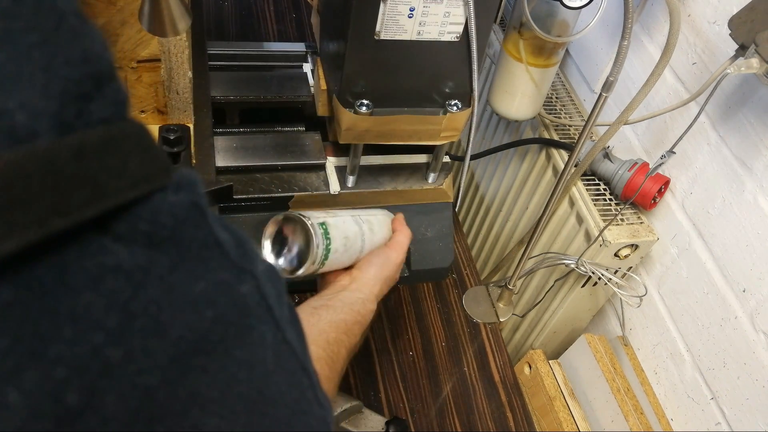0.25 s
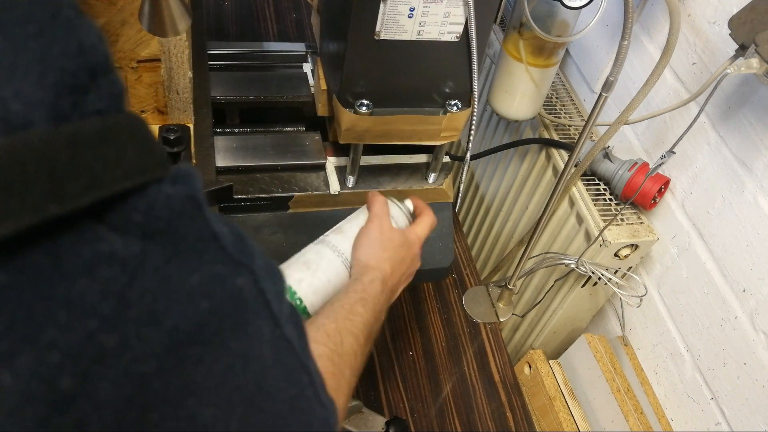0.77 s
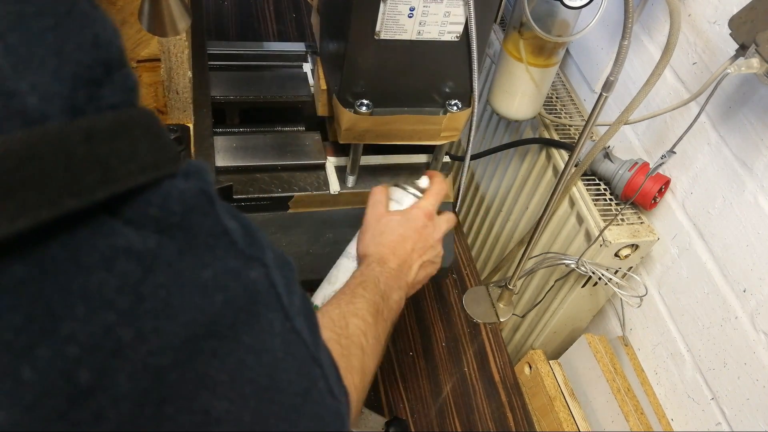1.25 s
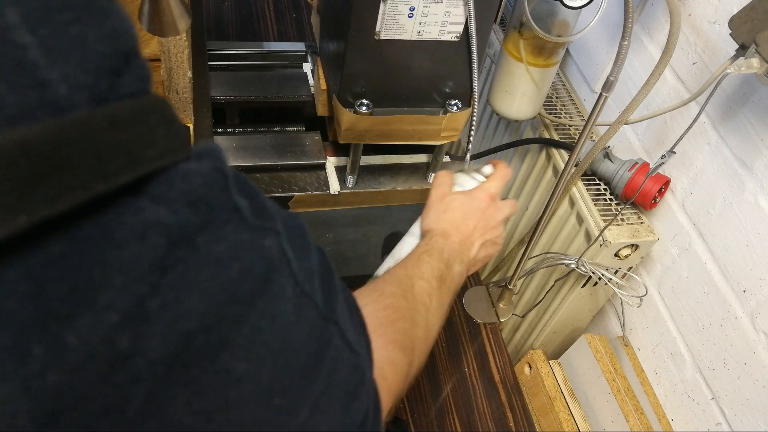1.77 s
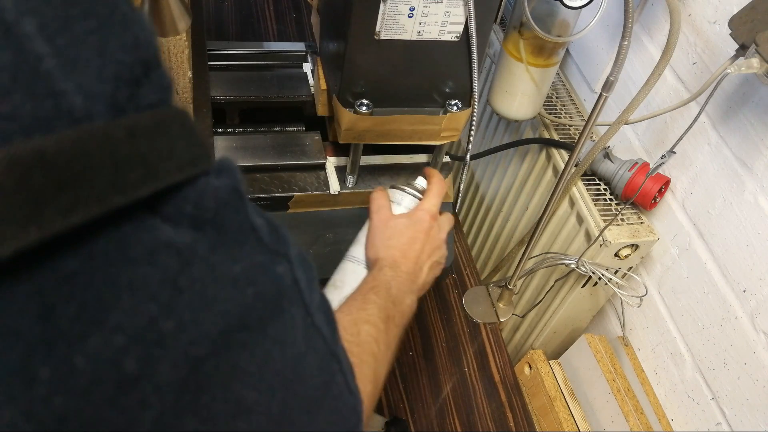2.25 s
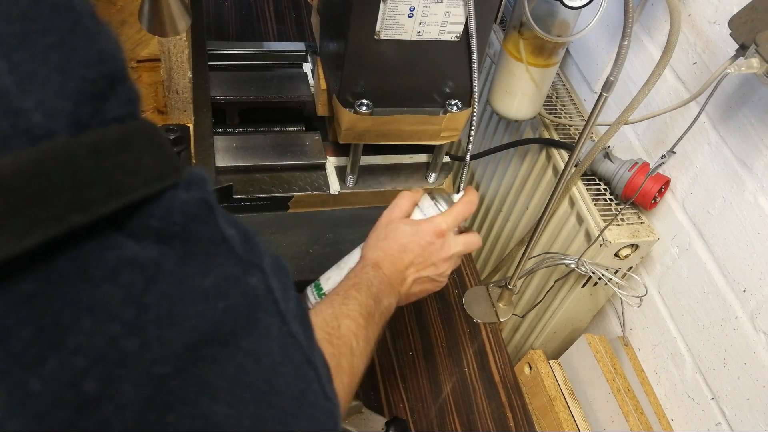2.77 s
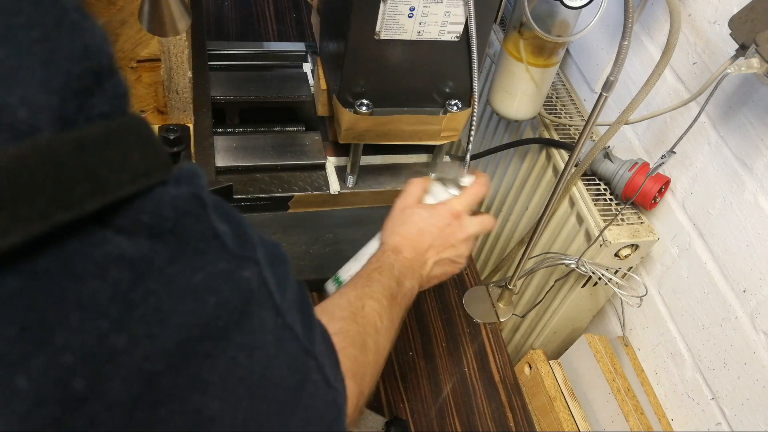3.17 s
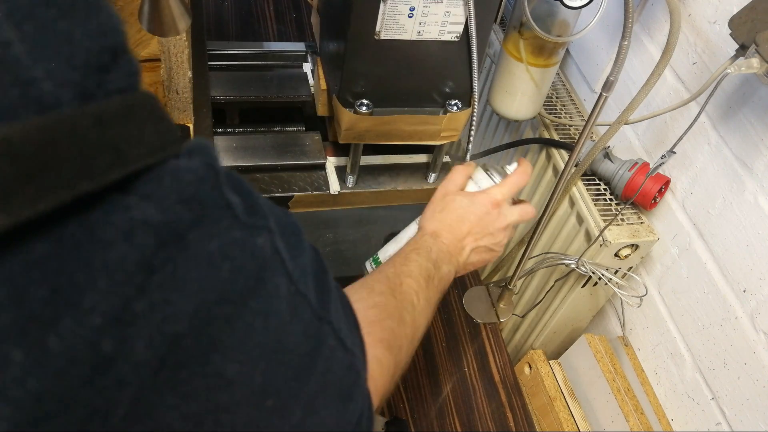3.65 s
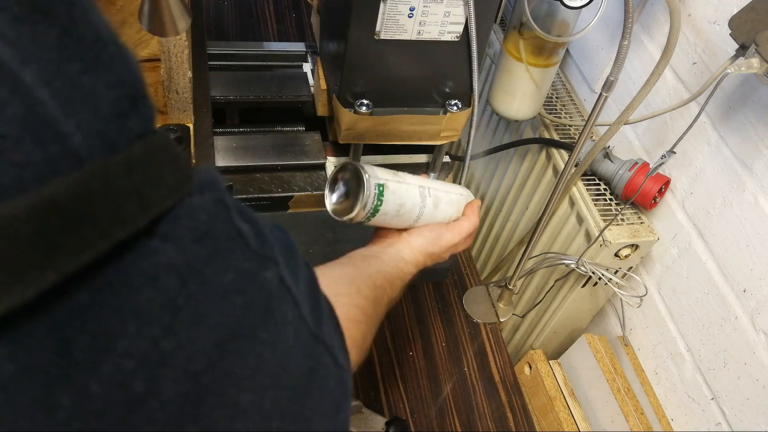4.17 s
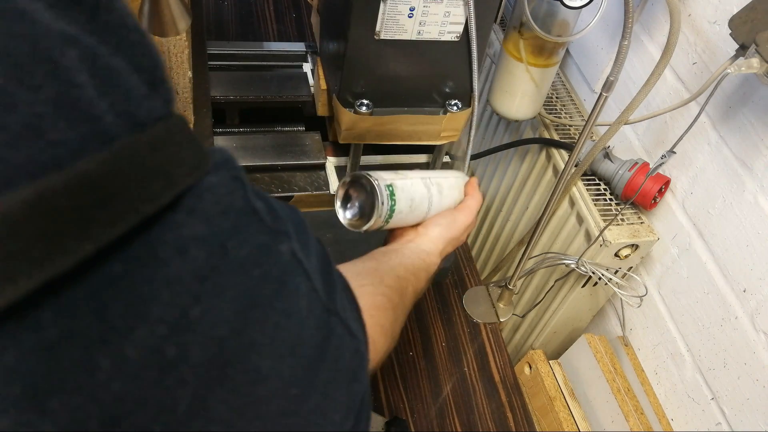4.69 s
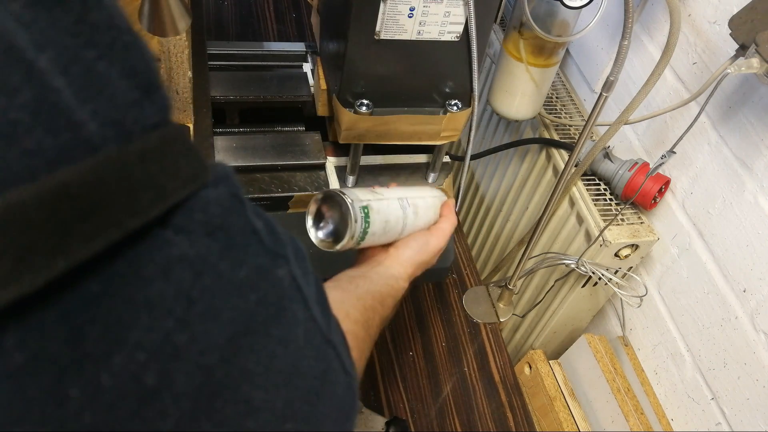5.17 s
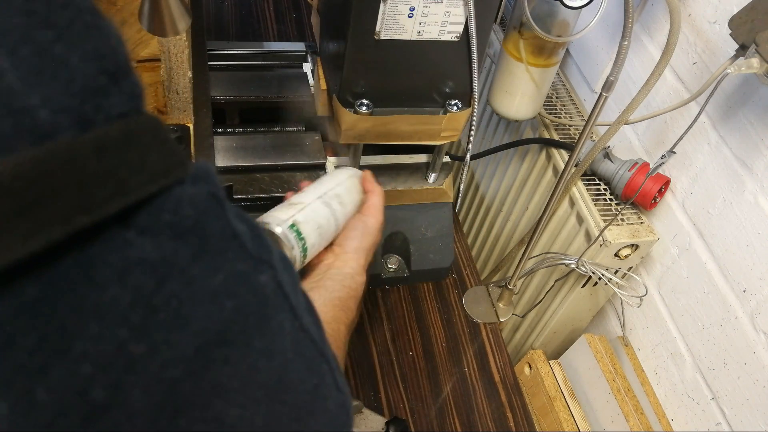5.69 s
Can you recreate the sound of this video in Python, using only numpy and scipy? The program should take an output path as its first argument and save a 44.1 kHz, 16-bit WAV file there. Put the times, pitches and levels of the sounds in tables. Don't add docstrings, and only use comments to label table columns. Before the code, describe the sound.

Close stereo pickup of a spray can: quick irregular clacks and dull knocks first, with a puff or two of gas; then quieter tinkling, rolling and waveringly ringing metal between crisp, short sprays; finally a vigorous, brighter rattle with the loudest cracks, more hisses and a faint low rumble of the moving arm. Small dry room, little bass, very quiet background.

```python
import sys
import numpy as np
from scipy import signal
from scipy.fft import rfft, irfft, next_fast_len
from scipy.io import wavfile

SR = 44100
rng = np.random.default_rng(int(sys.argv[2]) if len(sys.argv) > 2 else 0)


def materialize(psi):
    bounded = np.clip(np.atleast_2d(psi).T, -1, 1)
    quanta = np.round(bounded * 32767).astype(np.int16)
    wavfile.write(sys.argv[1], SR, quanta)


def makeup_ratio(level_db):
    decades = np.asarray(level_db, float) / 20
    return 10 ** decades


N = 261513

# f/Hz, level/dB, t60/s
WALL_MODES = [(790, -13, .1), (1170, -7, .1), (1430, -9, .05), (1540, -5, .1), (1720, -2, .09),
              (1800, -5, .09), (1865, -2, .11), (1960, 0, .09), (2200, -6, .07), (2330, -6, .07),
              (2460, -5, .12), (2800, -3, .05), (3400, -3, .04), (3600, -4, .04), (3850, -2, .04),
              (4080, -2, .04), (4440, -6, .06), (4540, -10, .07), (4620, -9, .1), (4720, -11, .06)]
# f/Hz, level/dB per Hz
WASH_SPECTRUM = [(290, -5.5), (500, -13), (794, -5.5), (1080, -6), (1160, -5.5), (1390, -0.5), (1650, -1.5),
                 (2040, -2.5), (2340, 1.5), (4580, 1), (5000, 0.5), (6500, 3), (11000, -120)]

LEFT_RIGHT = np.array([[.5], [-.5]])
KNOCK_LEFT_DB = 2
DOME_LOW_HZ, DOME_HIGH_HZ = 4400, 4800
UPRIGHT_FROM_S, UPRIGHT_TO_S = 1.1, 4.25
SLOSH_HZ, SLOSH_DEPTH, DAMPING = 45, 0.8, 0.75
SONG_WAVER = .5


def ball():
    # f/Hz, level/dB per Hz
    crack_spectrum = [(1180, -60), (2000, -22), (2360, -7.5), (2980, -10.5), (4120, -5), (4990, -11),
                      (8850, -12), (12000, -23), (14300, -18), (16000, -33)]
    # f/Hz, level/dB per Hz
    thud_spectrum = [(290, -58), (500, -7), (781, -11), (951, -7), (1450, 3), (1710, 3), (2400, -2.5),
                     (3120, -2), (5280, -120)]
    s, peak_db, thud_db, crack_db, struck_hz, ring_db = knocks().T
    upright = (s > UPRIGHT_FROM_S) & (s < UPRIGHT_TO_S)
    regrip = (s > 1.1) & (s < 1.25)
    grip_db = np.where(upright, 0, -6) + 1 * regrip
    touch, dome_touch = rolling() * rolls()

    body = coloured(crack_spectrum)
    middle = signal.sosfiltfilt(signal.butter(4, 7200, fs=SR, output="sos"), body)
    out = clack(rms_one(middle), crack_db, struck_hz) + pings()
    top_snap = burst(strikes(crack_db - 7.5), 0.00016, 0.024)
    top_tail = burst(strikes(crack_db - 29.5), 0.0014, 0.24)
    out += rms_one(body - middle) * (top_snap + top_tail)
    out += coloured(thud_spectrum) * burst(strikes(thud_db - 7.5), 0.0005, 0.081)
    out += makeup_ratio(-24) * body * burst(np.abs(touch), 0.00038, 0.026)

    for hz, level_db, t60 in WALL_MODES:
        low = np.clip((2300 - hz) / 300, 0, 1)
        uneven_db = rng.normal(0, 2.6, (len(s), 2)).T
        held_db = grip_db * (t60 >= .1)
        clicks = strikes(-17.0 + low * (thud_db + 3.5) + uneven_db + held_db)
        on_dome = DOME_LOW_HZ < hz < DOME_HIGH_HZ
        clicks += makeup_ratio(-19) * dome_touch if on_dome else makeup_ratio(-33 + 7 * low) * touch
        push = rng.choice(np.array([-1, 1], np.int8), (2, N))
        out += slosh() * ring(makeup_ratio(level_db) * clicks * push, hz, DAMPING * t60)
    return signal.sosfilt(signal.butter(3, 700, "high", fs=SR, output="sos"), out)


def knocks():
    # t/s, peak level/dB, spot pitch f/Hz, thud level/dB re peak
    side_knocks = [(0.0187, -30.5, 2155, -4), (0.171, -25, 1706, -8), (0.2816, -19, 2290, -20.5),
                   (0.5245, -40, 1840, -3), (0.543, -31, 2330, -14), (0.6002, -25.5, 2500, -12.5),
                   (0.6512, -24.5, 1770, -9), (0.6899, -29.5, 2500, -12), (1.133, -23.5, 2140, -8.5),
                   (1.162, -28, 2380, -5), (1.1853, -45.5, 1590, 12), (1.9741, -37, 1970, -9),
                   (1.9892, -34, 2120, -16), (2.018, -51, 1740, -1), (3.4046, -35, 1870, -7.5),
                   (3.77, -57.5, 1950, 8), (3.8681, -41, 1820, -3), (4.1444, -70, 1580, 14),
                   (4.5022, -20.5, 1455, -5), (4.5812, -22.5, 1416, -7.5), (4.638, -27, 1680, -6.5),
                   (5.026, -27, 2280, -35), (5.0468, -30, 2400, -8), (5.0502, -23.5, 3000, -22),
                   (5.1009, -26, 1980, -7), (5.147, -27.5, 1810, -5.5), (5.1802, -29.5, 1600, -6),
                   (5.204, -32, 1644, -7), (5.487, -21, 2620, -15.5), (5.5454, -26.5, 2420, -7.5),
                   (5.6284, -23, 1454, -8), (5.66, -26, 1690, -14), (5.6812, -31, 2250, -19),
                   (5.87, -26, 2300, -38)]
    # t/s, peak level/dB, pitch f/Hz, crack level/dB re peak
    slams = [(0.1021, -19, 4920, -10), (0.1265, -19.5, 4980, -7), (0.1415, -24.5, 4300, -16),
             (0.2979, -19.5, 3900, -4), (0.3255, -16.5, 6000, -6.5), (0.507, -27, 4050, -23),
             (0.6947, -22, 4040, -7), (0.75, -27.5, 3200, -1.5), (3.827, -23, 3570, -7.5),
             (4.4101, -8, 4100, -1.5), (4.848, -36, 3900, -12), (4.828, -25.5, 3400, -16),
             (5.2376, -12.5, 4530, 0), (5.4016, -16, 3680, -24)]
    # t/s, peak level/dB, pitch f/Hz, crack level/dB re peak
    glances = [(0.0548, -24.5, 3650, -7), (0.346, -20.5, 3900, -11), (0.374, -20.5, 5130, -6),
               (0.4441, -26, 3780, -5), (0.484, -23.5, 4410, -3), (0.713, -27, 3760, -4.5),
               (0.726, -28.5, 3920, -19), (0.462, -30.5, 3450, -15), (0.821, -37, 3100, -17),
               (0.7826, -20, 3790, -6), (0.93, -41, 3260, -11), (4.6695, -11, 6000, -3.5),
               (4.7566, -12.5, 3680, -11), (4.8098, -18.5, 4250, -4), (4.8816, -18.5, 4200, -5),
               (4.9155, -21, 4060, -15), (4.942, -24.5, 4280, -8), (4.9766, -23, 3740, -13.5),
               (5.0064, -22, 4160, -14), (5.222, -41, 4000, 1), (5.378, -19.5, 3970, -4),
               (5.693, -11.5, 4340, -3), (5.79, -26.5, 4340, -10), (5.777, -34, 3000, -10),
               (5.881, -25, 4180, -19), (5.899, -31, 3850, -15), (5.8359, -20.5, 5020, -15),
               (5.856, -26, 4650, -20)]
    # t/s, peak level/dB, thud level/dB re peak, crack level/dB re peak
    dome_drops = [(1.302, -16, -15, -1.5), (1.322, -55, -14, 18), (1.3831, -19.5, -16.5, -5),
                  (1.4544, -23.5, -12.5, -5), (1.4775, -56, -28, 0), (1.4995, -29, -28, -2),
                  (1.5115, -36, -22, -6), (1.633, -28.5, -16, -1.5), (1.659, -48, -14, 13),
                  (1.6896, -36.5, -7, 2.5), (2.0349, -32, -19, -14), (2.037, -31.5, -23, -9.5),
                  (2.051, -35, -21, -13), (2.071, -41, -2.5, -3), (2.134, -43.5, -20, -16),
                  (2.255, -53.5, -8, -1), (2.448, -43, -29, -19), (2.466, -48, -20, -6),
                  (2.856, -35, -12, -6), (2.914, -46, -9.5, -4), (3.0114, -53, -21, -12),
                  (3.3758, -29.5, -13.5, -3), (3.726, -43, -19, -8), (3.8909, -37.5, 1.5, 0),
                  (4.131, -52, -1, -22)]
    side_crack_db, side_ring_db, cupped_db = -5, -11.5, -5
    slam_thud_db, slam_ring_db = -24, -12
    glance_thud_db, glance_ring_db = -28.5, -13
    dome_ping_hz, dome_ring_db = 4620, -5
    rows = []
    for s, db, hz, thud in side_knocks:
        rows.append((s, db, thud, side_crack_db, hz, side_ring_db + cupped_db * (s > UPRIGHT_TO_S)))
    for s, db, hz, crack in slams:
        rows.append((s, db, slam_thud_db, crack, hz, slam_ring_db))
    for s, db, hz, crack in glances:
        rows.append((s, db, glance_thud_db, crack, hz, glance_ring_db))
    for s, db, thud, crack in dome_drops:
        rows.append((s, db, thud, crack, dome_ping_hz, dome_ring_db))
    return np.array(rows)


def strikes(db):
    rows, out = knocks(), np.zeros((2, N))
    out[:, (rows[:, 0] * SR).astype(int)] = makeup_ratio(rows[:, 1] + db + KNOCK_LEFT_DB * LEFT_RIGHT)
    return out


def clack(body, crack_db, struck_hz):
    spot_bands = [2000, 2600, 3200, 3800, 4500, 5500, 7200]
    snap_s, spread_s = .025, .0006
    out = 0
    for k, (low, high) in enumerate(zip(spot_bands, spot_bands[1:])):
        near = np.log(np.sqrt(low * high) / struck_hz) / .25
        bright_db = np.clip((low - 4000) / 3000, 0, 1) * (crack_db + 8)
        band_filter = signal.butter(2, [low, high], "band", fs=SR, output="sos")
        band = (-1) ** k * makeup_ratio(-8.5 if high < 6000 else -3) * signal.sosfilt(band_filter, body)
        snap_db = -6.5 + 7.7 * np.exp(-near ** 2) + 0.43 * bright_db
        snap = lag(burst(strikes(snap_db), spread_s, snap_s), spread_s / 2)
        tail = burst(strikes(-18 + bright_db), 0.0014, 0.19)
        out = out + band * (snap + tail)
    return out


def pings():
    out, t = np.zeros((2, N + SR)), np.arange(SR // 5) / SR
    chance = rng.random((len(knocks()), 5))
    for (s, peak_db, thud_db, crack_db, hz, ring_db), (a, b, c, d, e) in zip(knocks(), chance):
        on_dome = DOME_LOW_HZ < hz < DOME_HIGH_HZ
        t60 = .055 if on_dome else .05 * (2000 / hz) ** .7
        main = np.sin(2 * np.pi * (hz * t + a + behind(hz, b)))
        twin = .6 * np.sin(2 * np.pi * (hz * (.965 + .07 * e) * t + [[c], [d]]))
        swell = makeup_ratio(-60 * t / t60) * np.minimum(t / .002, 1)
        start = int(s * SR)
        out[:, start:start + len(t)] += makeup_ratio(peak_db + ring_db) * swell * (main + twin)
    return (1 + SONG_WAVER * drift(SLOSH_HZ)) * out[:, :N] * makeup_ratio(KNOCK_LEFT_DB * LEFT_RIGHT)


def rolling():
    sizes = makeup_ratio(3.8 * np.minimum(rng.exponential(1, N), 4))
    contacts_per_s = 900 * makeup_ratio(3 * drift(25))
    return rms_one(sizes * (rng.random(N) < contacts_per_s / SR))


def rolls():
    # loudest t/s, swell t/s, fade t/s, wall level/dB, domed base level/dB
    roll_events = [(0.511, 0.022, 0.15, -52.5, -43.5), (0.72, 0.079, 1, -56, -71),
                   (1.15, 0.018, 0.31, -55, -50), (1.5, 0.23, 0.21, -49.5, -47),
                   (1.652, 0.0076, 0.21, -50.5, -41.5), (2.04, 0.16, 0.039, -51, -57),
                   (2.454, 0.048, 0.044, -61, -53), (2.859, 0.16, 0.1, -60, -53),
                   (3.015, 0.015, 0.19, -72, -72), (3.41, 0.65, 0.032, -61.5, -85),
                   (3.735, 0.054, 0.1, -59.5, -74), (3.847, 0.04, 0.24, -46, -50),
                   (4.18, 0.21, 0.16, -66, -84), (5.89, 0.092, 0.2, -57.5, -50)]
    span_db, curve = 55.5, 1.5
    out = np.zeros((2, N))
    for top, swell, fade, wall_db, dome_db in roll_events:
        t = np.arange(N) / SR - top
        loss_db = span_db * np.maximum(-t / swell, t / fade) ** curve
        out += makeup_ratio(np.array([[wall_db], [dome_db]]) - np.minimum(loss_db, 200))
    return out


def slosh():
    return (1 + SLOSH_DEPTH * drift(SLOSH_HZ)) / np.hypot(1, SLOSH_DEPTH)


def songs():
    # t/s, held t/s, f/Hz, level/dB
    palm_songs = [(0.102, 0.01, 2206, -47.5), (0.17, 0.049, 1710, -47), (0.171, 0.014, 2250, -44),
                  (0.282, 0.026, 1760, -44), (0.283, 0.03, 1500, -48), (0.405, 0.018, 1340, -60),
                  (0.4, 0.051, 2450, -54), (0.652, 0.039, 1767, -48.5), (0.281, 0.028, 2295, -38),
                  (0.715, .025, 3780, -51), (0.75, 0.01, 3160, -49), (0.752, 0.0083, 1200, -55.5),
                  (0.81, 0.052, 3110, -55), (0.82, 0.06, 2450, -55), (0.93, 0.076, 3220, -50),
                  (4.503, 0.072, 1870, -47.5), (4.507, 0.03, 1300, -47), (4.503, 0.015, 2280, -54),
                  (4.583, .014, 1450, -45), (4.583, 0.023, 2370, -58), (4.641, 0.043, 1735, -50),
                  (4.411, 0.016, 2440, -47), (4.415, 0.011, 1464, -48), (4.765, 0.021, 2250, -42.5),
                  (4.85, .1, 2300, -54), (4.83, 0.01, 3500, -38), (4.811, 0.0072, 3910, -33),
                  (5.402, .01, 3800, -38), (4.67, 0.01, 1660, -43), (4.685, .025, 2500, -50),
                  (5.046, 0.0037, 2460, -33), (5.101, 0.014, 2010, -46), (5.103, 0.016, 2560, -50),
                  (5.148, .04, 1700, -57), (5.15, 0.039, 1175, -55), (5.181, 0.041, 1624, -48),
                  (5.489, .012, 3430, -42), (5.488, .01, 2546, -39.5), (5.547, 0.012, 1270, -53),
                  (5.63, 0.099, 1536, -46.5), (5.63, 0.03, 1610, -50), (5.694, 0.056, 2310, -52),
                  (5.855, 0.1, 2370, -45)]
    # t/s, held t/s, f/Hz, level/dB
    free_songs = [(1.132, 0.009, 824, -50.5), (1.162, 0.053, 796, -53), (1.136, 0.067, 1554, -44),
                  (1.135, 0.016, 1846, -44), (1.162, 0.034, 1265, -51), (1.185, 0.035, 2425, -45.5),
                  (1.165, 0.053, 3000, -69), (1.183, 0.032, 1914, -50), (1.225, 0.1, 1876, -50.5),
                  (1.222, 0.086, 2440, -51.5), (1.133, 0.0084, 2197, -39), (1.162, .012, 2350, -44),
                  (1.399, .1, 4560, -55), (1.32, 0.045, 4480, -40), (1.47, 0.018, 4650, -43),
                  (1.8, 0.098, 937, -56), (2.719, 0.046, 1163, -53.5), (1.64, .06, 4580, -57),
                  (2.059, 0.038, 4620, -62), (2.45, 0.035, 4640, -54), (2.74, 0.087, 4650, -68),
                  (2.86, .09, 4640, -62), (2.95, .06, 4600, -74), (1.303, 0.012, 2300, -44),
                  (1.385, 0.016, 3300, -47), (1.43, .07, 2570, -46), (1.53, 0.038, 1870, -46),
                  (1.633, 0.014, 2135, -50), (1.66, .06, 2060, -49.5), (1.699, 0.035, 4670, -50),
                  (1.95, 0.088, 1950, -57), (2.025, 0.04, 1840, -51), (2.0, 0.087, 2520, -48),
                  (2.22, 0.037, 2460, -74), (2.439, 0.04, 1826, -63), (2.446, 0.025, 2460, -57),
                  (2.85, 0.047, 1840, -60), (2.91, 0.015, 2000, -60), (3.101, .06, 1150, -52.5),
                  (3.271, 0.1, 1913, -57.5), (3.28, 0.095, 2520, -64), (3.372, 0.025, 2550, -52),
                  (3.39, 0.029, 1860, -46.5), (3.7, .1, 1910, -61), (3.72, .07, 2440, -63),
                  (3.827, 0.12, 1906, -44.5), (3.899, 0.043, 1730, -56), (4.09, 0.13, 1205, -67.5),
                  (4.12, 0.083, 1594, -69), (4.225, .025, 2520, -44)]
    sag_db_per_s, fall_db_per_s = 110, 1100
    start_db, start_s = 7, .008
    wander_cycles = .16
    out, rows = np.zeros((2, N)), palm_songs + free_songs
    wavers = [1 + SONG_WAVER * drift(SLOSH_HZ) for k in range(4)]
    wanders = [wander_cycles * drift(SLOSH_HZ) for k in range(3)]
    chance = rng.random((len(rows), 2))
    for k, ((s, held, hz, db), (phase, apart)) in enumerate(zip(rows, chance)):
        i = int(s * SR)
        t = np.arange(min(SR // 4, N - i)) / SR
        span = slice(i, i + len(t))
        loss_db = sag_db_per_s * t - start_db * np.exp(-t / start_s)
        loss_db = loss_db + fall_db_per_s * np.maximum(t - held, 0)
        gain = makeup_ratio(db - loss_db) * np.minimum(t / .002, 1) * wavers[k % 4][span]
        cycles = hz * t + phase + wanders[k % 3][span] + behind(hz, apart)
        out[:, span] += gain * np.sin(2 * np.pi * cycles)
    return out * makeup_ratio(KNOCK_LEFT_DB * LEFT_RIGHT)


def behind(hz, chance):
    left_leads_s = .00009
    widest_lead_cycles = .2
    lead = min(hz * left_leads_s, widest_lead_cycles)
    return np.array([[0], [.15 * (chance - .5) - lead]])


def puffs():
    # f/Hz, level/dB per Hz
    hiss_spectrum = [(2650, -46), (4500, -10), (5110, -9), (6700, -8.5), (8740, -6.5), (10400, -6),
                     (12900, -5.5), (14900, -6), (16000, -14)]
    # f/Hz, level/dB per Hz
    gas_spectrum = [(53, -43), (100, -6.5), (150, -14), (216, 3.5), (368, 3), (436, -13), (520, -58),
                    (680, -39), (1140, -120)]
    flicker_db = 1.2
    jet_bands_db = 2.2
    hiss = valve(column=2, short_db=8.5, swell_s=0.035, sag_db_per_s=6.5, fall_db_per_s=346)
    wash = valve(column=3, short_db=25.5, swell_s=0.018, sag_db_per_s=16, fall_db_per_s=233)
    gas = makeup_ratio(-14.5) * lag(wash, 0.018)
    jet_noise = coloured(hiss_spectrum, flicker_db, jet_bands_db)
    wash_noise = coloured(WASH_SPECTRUM, 2 * flicker_db, jet_bands_db)
    out = makeup_ratio(4.5) * staggered(hiss, jet_noise, 8800, .014)
    out += makeup_ratio(5.0) * staggered(wash, wash_noise, 2000, 0.01)
    out += makeup_ratio(-23.0) * lag(wash, 0.1) * coloured([(180, -33), (205, 4.0), (235, -35)])
    out += gas * coloured(gas_spectrum, 2 * flicker_db)
    return out + makeup_ratio(-5) * wash * stirred_wall()


def valve(column, short_db, swell_s, sag_db_per_s, fall_db_per_s):
    # valve opens t/s, held t/s, nozzle hiss level/dB, wall wash level/dB
    puff_events = [(-0.12, 0.13, -37, -41), (0.335, 0.16, -38.5, -46), (0.49, 0.097, -72, -48.5),
                   (0.906, 0.14, -38, -45.5), (1.352, 0.13, -38, -46), (1.772, 0.12, -38, -44.5),
                   (2.636, 0.14, -38, -47.5), (3.08, 0.13, -36.5, -45), (3.514, 0.13, -38, -45),
                   (4.195, 0.16, -37, -46), (4.719, 0.19, -38, -47), (5.249, 0.16, -38.5, -46),
                   (5.712, 0.11, -39, -45.5)]
    open_s, knee_s = 0.0054, 0.013
    out = np.zeros(N)
    for row in puff_events:
        t = np.arange(N) / SR - row[0]
        let_go = knee_s * np.logaddexp(0, (t - row[1]) / knee_s)
        since = np.maximum(t, 0)
        db = row[column] - short_db * np.exp(-since / swell_s)
        db = db - sag_db_per_s * since - fall_db_per_s * let_go
        out += np.clip(t / open_s, 0, 1) ** 2 * makeup_ratio(db)
    return out


def staggered(gain, noise, hz, late_s):
    low = signal.sosfiltfilt(signal.butter(2, hz, fs=SR, output="sos"), noise)
    late = np.interp(np.arange(N) - late_s * SR, np.arange(N), gain)
    return gain * (noise - low) + late * low


def stirred_wall():
    noise = [coloured(WASH_SPECTRUM), coloured(WASH_SPECTRUM)]
    out = 0
    for k, (hz, db, t60) in enumerate(WALL_MODES):
        mode = rms_one(ring(noise[k % 2], hz, t60 / 2))
        out = out + makeup_ratio(db / 2 + 3 * drift(3)) * mode
    return rms_one(out)


def arm():
    # t/s, level/dB
    rumble_spells = [
        [(4.72, -89), (4.928, -73), (5.02, -77)],
        [(5.25, -95), (5.356, -62), (5.56, -82)],
    ]
    gain, t = np.zeros(N), np.arange(N) / SR
    for times, levels_db in map(np.transpose, rumble_spells):
        edge = np.clip(np.minimum(t - times[0], times[-1] - t) / .012 + 1, 0, 1)
        gain += edge * makeup_ratio(np.interp(t, times, levels_db))
    return gain * coloured([(45, -20), (70, -10), (110, 5), (150, -20)])


def workshop(x):
    room_t60_s, wall_cut_hz = 0.24, 6000
    size = next_fast_len(N + SR)
    w = 2 * np.pi * np.fft.rfftfreq(size)
    dull = 1 / (1 + (w * SR / (2 * np.pi * wall_cut_hz)) ** 2) ** .25
    source, out = rfft(x.mean(axis=0), size), []
    for lags in rng.uniform(.007, .028, (2, 10)):
        echoes = 0
        for k, d in enumerate(lags):
            loop = makeup_ratio(-60 * d / room_t60_s) * dull * np.exp(-1j * w * round(d * SR))
            echoes = echoes + (-1) ** k * loop / (1 - loop)
        out.append(irfft(source * echoes, size)[:N])
    return np.array(out)


def air():
    # f/Hz, level/dB per Hz
    air_spectrum = [(12, -41), (20, 2), (49, -8.5), (300, -9.5), (660, -16), (1810, -12.5), (2080, -14.5),
                    (2460, -12.5), (4670, -14.5), (6540, -16), (13900, -25.5), (15600, -28), (16000, -43)]
    return makeup_ratio(-68) * coloured(air_spectrum)


def coloured(spectrum, patchy_db=0, bands_db=0):
    # f/Hz, correlation/1
    likeness = [(25, .78), (60, .9), (200, .88), (350, .65), (560, .05), (1000, .3), (1800, 0), (15000, 0)]
    # f/Hz, level/dB
    left_bias = [(60, 0.5), (110, 0.0), (200, 0.0), (380, 0.0), (700, 2.5), (1290, -1.0), (2380, 4.0),
                 (4400, 3.5), (8120, 0.0), (13000, 7.0)]
    size = next_fast_len(N)
    hz = np.fft.rfftfreq(size, 1 / SR) + 1
    mid, side = rfft(rng.standard_normal((2, size)))
    alike = np.clip(at_hz(likeness, hz), -1, 1)
    pair = np.sqrt(1 + alike) * mid + np.sqrt(1 - alike) * side * [[1], [-1]]
    pair = pair * makeup_ratio(at_hz(spectrum, hz, -90) + at_hz(left_bias, hz) * LEFT_RIGHT)
    if not patchy_db:
        return rms_one(irfft(pair, size)[:, :N])
    if bands_db:
        group = rng.integers(0, 6, 200)[(10 * np.log2(hz)).astype(int)]
    else:
        group = (2 * np.log2(hz)).astype(int) % 3
    out = 0
    for k in range(group.max() + 1):
        flicker = makeup_ratio(patchy_db * drift(12.6) + bands_db * drift(2.6))
        out = out + irfft(pair * (group == k), size)[:, :N] * flicker
    return rms_one(out)


def at_hz(points, hz, outside=None):
    points_hz, values = np.transpose(points)
    return np.interp(np.log(hz), np.log(points_hz), values, outside, outside)


def rms_one(x):
    return x / np.sqrt(np.mean(x ** 2) + 1e-20)


def drift(rate):
    r = np.exp(-80 * np.pi * rate / SR)
    slow = signal.lfilter([1], [1, -2 * r, r * r], rng.standard_normal(N // 40 + 2002))[2000:]
    return np.interp(np.arange(N) / 40, np.arange(len(slow)), rms_one(slow))


def ring(clicks, hz, t60):
    r, w = makeup_ratio(-60 / (t60 * SR)), 2 * np.pi * hz / SR
    return signal.lfilter([0, np.sin(w)], [1, -2 * r * np.cos(w), r * r], clicks + 1e-18)


def burst(clicks, rise_s, t60):
    r = makeup_ratio(-60 / (t60 * SR))
    return lag(signal.lfilter([1], [1, -r], clicks + 1e-18), rise_s)


def lag(x, seconds):
    q = np.exp(-1 / (seconds * SR))
    return signal.lfilter([1 - q], [1, -q], x)


def scene():
    hits, sung = ball(), songs()
    tail = makeup_ratio(-13.5) * workshop(hits + sung / 2)
    return hits + sung + tail + puffs() + arm() + air()


def roll_off(x):
    return signal.sosfilt(signal.butter(12, 16990, fs=SR, output="sos"), x)


def record(dry):
    return roll_off(dry)


dry = scene()
out = record(dry)
materialize(out)
```